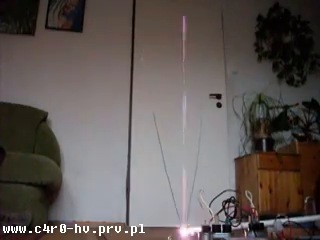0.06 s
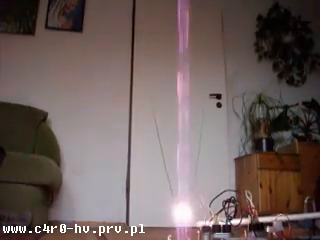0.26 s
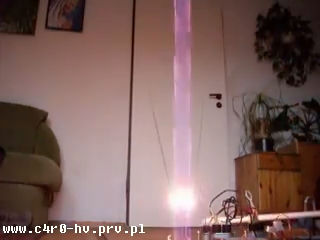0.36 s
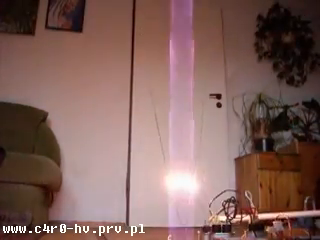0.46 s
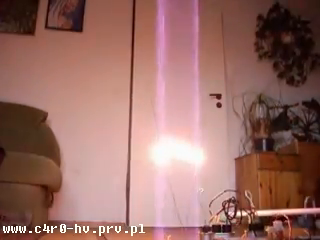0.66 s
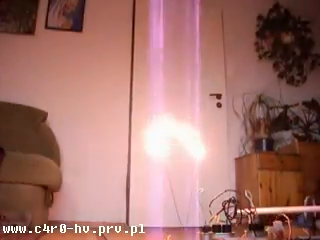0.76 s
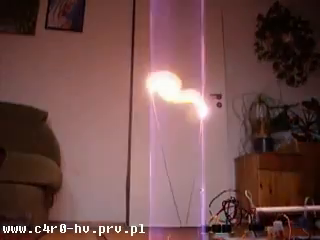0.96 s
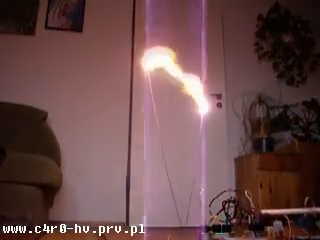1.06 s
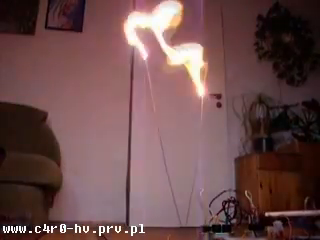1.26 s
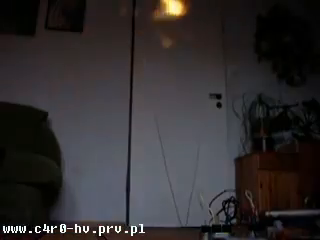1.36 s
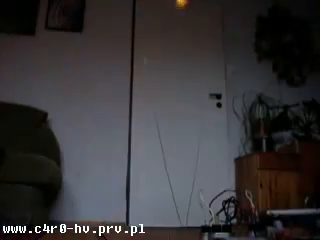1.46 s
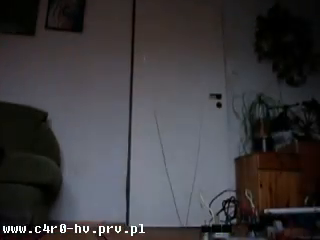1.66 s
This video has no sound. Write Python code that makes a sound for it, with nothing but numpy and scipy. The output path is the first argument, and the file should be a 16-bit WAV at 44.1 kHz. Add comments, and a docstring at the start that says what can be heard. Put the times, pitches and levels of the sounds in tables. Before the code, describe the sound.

In a small quiet room, a high-voltage arc snaps and sizzles to life, growing into a loud, raspy, crackling buzz. Its hum deepens as it stretches, until it suddenly breaks and only faint hiss remains.

```python
"""A mains arc strikes at the foot of two diverging wires, climbs, stretches and breaks, in a small room. It
relights on every half cycle, and the suddenly heated air gives a pressure pop and a bright crackle. The longer
the arc gets, the deeper it hums and the more its pops split and scatter. The room rings briefly after the
break. A steady hiss and a faint low flutter lie under the whole scene."""
import sys
import numpy as np
from scipy import signal
from scipy.fft import rfft, irfft
from scipy.io import wavfile

SR = 44100
rng = np.random.default_rng(int(sys.argv[2]) if len(sys.argv) > 2 else 0)


def generate_wav(signal):
    """Clip the signal to [-1, 1] and save it as 16-bit WAV at the path in sys.argv[1]."""
    frames = np.transpose(np.atleast_2d(signal))
    scaled = np.clip(frames, -1, 1) * 32767
    pcm = np.round(scaled).astype(np.int16)
    wavfile.write(sys.argv[1], SR, pcm)


N = 74970

RESTRIKE_HZ, FIRST_STRIKE_S = 99.78, .0502  # two strikes per mains cycle
BREAK_S, BREAK_FADE_S = 1.296, 0.004
TOP_HZ = 7150  # upper band edge

# Growth of the climbing arc: time_s, nominal_leg_lag_ms, pop_width_ms, pop_bass_db
ARC_GROWTH = [(.25, 0.06, 0.04, -34), (.36, 0.36, 0.14, -5), (.5, 0.24, 0.17, -3), (.65, 0.13, 0.12, 2.5),
              (.75, 0.84, 0.17, -1.5), (.81, 1.39, .12, 0.5), (1.08, 1.25, 0.19, -2.5),
              (1.17, 0.89, 0.17, 3.5), (1.29, 0.72, 0.35, 5)]
# Violent restrikes: time_s, relative_crack_db, brightness (0 to 1), extra_pop_db
VIOLENT_STRIKES = [(.07, -29, 0.46, -4.5), (.12, -24, 0.8, 1.5), (.15, -31.5, 1, 5), (.17, -39.5, .5, 8.5),
                   (.19, -15.5, 1, 4.5), (.23, -18, 1, 11), (.25, -26, .7, 8), (.27, -15.5, .9, 10.5),
                   (.29, -32, 0.7, 1.5), (.30, -18, 0.1, 10), (.33, -11.5, 0.5, 8), (.341, -26.5, 0.3, 3),
                   (.381, -29.5, 0.6, 2.5), (.441, -36.5, 0.5, 2), (.451, -31.5, 0.1, 4.5),
                   (.481, -17, 0.3, -30.5), (.521, -30, 0.2, 5), (.541, -24.5, 1, 3), (.622, -23, 0.4, 0.5),
                   (.672, -32, 0.3, 1), (.702, -30, 1, -1), (.823, -30, 0, 2), (.832, -38, 0, 7),
                   (.842, -23.5, 0, -21.5), (.892, -17.5, 0.83, 4), (.902, -27.5, 1, -2.5),
                   (.932, -25, 0.6, -9.5), (.982, -37, 0, -2), (1.012, -23, 0, -6.5), (1.072, -35, 0, 5),
                   (1.112, -32, 0.1, 0.5)]


def undb(db):
    """Decibels to amplitude ratio."""
    return 10 ** (np.asarray(db) / 20)


def curve(rows, t, column=1):
    """Linear interpolation of one column of a table over time."""
    rows = np.array(rows, float)
    return np.interp(t, rows[:, 0], rows[:, column])


def unit(x):
    """Normalisation to rms 1."""
    return x / np.sqrt(np.mean(x ** 2))


def colour(x, spectrum):
    """Zero-phase filtering that conserves the energy of a click or of white noise."""
    hz, db = np.array(spectrum, float).T
    f = np.fft.rfftfreq(2 * N, 1 / SR)
    gain = undb(np.interp(np.log(f + 1), np.log(hz), db)) / np.sqrt(1 + (f / TOP_HZ) ** 20)
    return irfft(rfft(x, 2 * N) * unit(gain))[:N]


def clicks(times, sizes):
    """Fractional delay: each impulse is shared between two neighbouring samples."""
    at = np.clip(times * SR, 0, N - 2)
    i = at.astype(int)
    return np.bincount(i, sizes * (1 - at + i), N) + np.bincount(i + 1, sizes * (at - i), N)


def nearest_strike(times):
    """Index of the periodic restrike nearest to each moment."""
    return np.maximum(np.round((times - FIRST_STRIKE_S) * RESTRIKE_HZ), 0).astype(int)


def burning(t):
    """Arc extinction: a gain of 1 that ramps to 0 at the break."""
    return np.clip((BREAK_S - t) / BREAK_FADE_S + 1, 0, 1)


def background(t):
    """Noise floor: steady hiss and a faint pulse train of soft thumps, heard as a low flutter."""
    # Spectrum of the hiss: frequency_hz, gain_db
    hiss_spectrum = [(20, 0.5), (70, -21.5), (130, 5), (320, -5), (600, -6), (1100, -15.5), (2500, -21.5),
                     (7000, -23)]
    flutter_hz, start_s, edge_s, decay_s = 30.1, .016, 0.0012, 0.0026
    from_thump_s = (((t - start_s) * flutter_hz + .5) % 1 - .5) / flutter_hz
    thumps = np.tanh(from_thump_s / edge_s) * np.exp(-np.abs(from_thump_s) / decay_s)
    return undb(-58.5) * unit(thumps) + undb(-60) * colour(rng.standard_normal(N), hiss_spectrum)


def room(x, tail_db):
    """Reverberation: early reflections, standing waves and a diffuse tail add to the direct sound."""
    # Reflections from nearby surfaces: delay_ms, gain
    reflections = [(1.8, 0.094), (4.1, 0.19), (6.9, 0.13), (14.2, 0.092)]
    # Spectrum of the diffuse tail: frequency_hz, gain_db
    tail_spectrum = [(80, -12.5), (400, -2), (800, 3.5), (1400, 2), (2500, 0.5), (7000, -18)]
    # Standing waves: frequency_hz, gain_at_resonance
    standing_waves = [(124, 1.5), (232, 2.3), (294, 2.4), (328, 2.2), (356, 1.9), (395, 2.16), (452, 0.4),
                      (474, 0.38), (499, 0.3), (552, 0.4), (590, 0.27), (647, 1.7), (683, 1.3), (752, 1.3),
                      (848, 1.2), (1098, 1.3)]
    tail_t60_s, tail_onset_s, mode_t60_s = 0.26, 0.0055, .42
    t = np.arange(N) / SR
    delay_ms, gain = np.array(reflections).T
    early = clicks(delay_ms / 1000, gain)
    fade = np.exp(-np.log(1000) * t / tail_t60_s) * (1 - np.exp(-(t / tail_onset_s) ** 2))
    tail = unit(colour(rng.standard_normal(N), tail_spectrum) * fade) * np.sqrt(2 * TOP_HZ / SR / N)
    damping = np.log(1000) / mode_t60_s
    modes = sum(g * np.cos(2 * np.pi * hz * t) for hz, g in standing_waves)
    modes *= np.exp(-damping * t) * 2 * damping / SR
    return x + signal.fftconvolve(x, early + modes + undb(tail_db) * tail)[:N]


def sizzle(t):
    """Amplitude-modulated noise: a fine hiss while the arc burns, strongest while it is short."""
    # Spectrum of the sizzle: frequency_hz, gain_db
    spectrum = [(100, -7.5), (400, 10.5), (800, 12), (1200, 3), (2500, -2), (5000, -1.5), (7000, -12.5)]
    # Envelope of the sizzle: time_s, level_db
    envelope = [(0, -58.5), (.045, -60), (.06, -54), (.16, -50), (.22, -42.5), (.33, -44), (.5, -48.5),
                (.75, -54), (1.29, -54.5)]
    return colour(rng.standard_normal(N), spectrum) * undb(curve(envelope, t)) * burning(t)


def hum(t):
    """Thermal expansion: the hot channel pulses with the current; the room holds the note at the break."""
    # Relative levels of the two harmonics: time_s, fundamental_db, octave_db
    envelopes = [(0.0, -64, -60.5), (0.16, -60.5, -51.5), (0.412, -42.5, -36.5), (0.458, -41.5, -37),
                 (0.626, -34.5, -28.5), (0.752, -31, -27.5), (0.876, -28, -31), (0.908, -32.5, -29),
                 (1.09, -30, -30), (1.25, -26, -42.5), (1.28, -35.5, -41)]
    lags_s, t60_s, waver_depth = (.0013, 0.00037), 0.39, 0.19
    release = np.exp(-np.log(1000) * np.maximum(t - BREAK_S + BREAK_FADE_S, 0) / t60_s)
    knots = np.arange(0, N / SR, 2 / RESTRIKE_HZ)
    tone = 0
    for harmonic, lag_s in enumerate(lags_s, 1):
        waver = 1 + waver_depth * np.interp(t, knots, rng.standard_normal(len(knots)))
        size = undb(curve(envelopes, t, column=harmonic)) * waver
        tone += size * np.cos(2 * np.pi * harmonic * RESTRIKE_HZ * (t - FIRST_STRIKE_S - lag_s))
    return np.sqrt(2) * undb(-2) * tone * release


def sparks(times, sizes, filaments=3):
    """Filamentary discharge: clusters of clicks, looser in a longer arc, with brief gritty tails."""
    decay_s, grit = .0007, .45
    t = np.arange(N) / SR
    spread_s = 1.9 * curve(ARC_GROWTH, times, column=2) / 1000
    offsets_s = rng.uniform(-0.77, 1, (len(times), filaments)).T * spread_s
    clusters = sum(clicks(times + offsets_s[k], (-1) ** k * sizes) for k in range(filaments))
    tail_envelope = signal.fftconvolve(clicks(times, sizes), np.exp(-t / decay_s))[:N]
    tails = grit * tail_envelope * rng.standard_normal(N)
    return (clusters / np.sqrt(filaments) + tails) / np.sqrt(1 + grit ** 2 * decay_s * SR / 2)


def crackle(times):
    """Dielectric breakdown: an uneven spark at each restrike, and violent cracks from dull to bright."""
    # Envelope of the small sparks: time_s, relative_level_db
    envelope = [(.05, -51.5), (.16, -58), (.25, -45), (.35, -32.5), (.5, -40.5), (.6, -38.5), (.72, -39),
                (.79, -40.5), (.87, -43.5), (.92, -38.5), (1.0, -47.5), (1.11, -42.5), (1.16, -70),
                (1.25, -47), (1.29, -70)]
    # Spectrum of small sparks and dull cracks: frequency_hz, gain_db
    dull_spectrum = [(300, -14.5), (900, 4.5), (1500, -6.5), (2000, 2.5), (2700, 2), (3400, -5),
                     (5000, -18), (7000, -32)]
    # Spectrum of bright cracks: frequency_hz, gain_db
    bright_spectrum = [(200, -30), (800, 6), (2600, -2.5), (4000, -3), (5200, -3.5), (7000, -20)]
    spark_trim_db, crack_trim_db, scatter_db, jitter_s = -0.5, 5.5, 2.5, 0.00035
    strength, lateness = rng.standard_normal((len(times), 2)).T
    spark_db = curve(envelope, times) + spark_trim_db + scatter_db * strength
    sizes = burning(times) * undb(spark_db) * np.sqrt(SR / RESTRIKE_HZ) / 2
    small = sparks(times + jitter_s * lateness, sizes)
    near_s, crack_db, brightness, _ = np.array(VIOLENT_STRIKES).T
    crack_times = times[nearest_strike(near_s)]
    cracks = sparks(crack_times, undb(crack_db + crack_trim_db))
    bright = cracks * np.interp(np.arange(N) / SR, crack_times, brightness)
    return colour(small + cracks - bright, dull_spectrum) + colour(bright, bright_spectrum)


def churn(pulses, decay_s=0.0021):
    """Turbulence: hot air leaves a decaying burst of noise after each pressure pulse."""
    envelope = signal.lfilter([1], [1, -np.exp(-1 / (decay_s * SR))], pulses)
    return envelope * rng.standard_normal(N) / np.sqrt(decay_s * SR / 2)


def pops(times):
    """Sudden heating: each leg of the arc sends a pressure pulse; their lag alternates with polarity."""
    # Envelope of the pops: time_s, relative_level_db
    envelope = [(.05, -60), (.13, -61.5), (.2, -44.5), (.28, -35), (.34, -26), (.42, -25), (.5, -26.5),
                (.57, -25), (.67, -26), (.76, -26.5), (.84, -27.5), (1.0, -23), (1.11, -26.5), (1.17, -34),
                (1.29, -35.5)]
    # Half cycles in which the arc relights softly: time_s, extra_pop_db
    soft_strikes = [(.261, -28), (.311, -8), (.321, -18), (.511, -23), (.872, -2.5)]
    # Spectrum of the pops: frequency_hz, gain_db
    spectrum = [(60, -21.5), (150, -11.5), (220, -5), (300, -0.5), (400, -1), (500, 3.5), (600, -2.5),
                (700, 2), (820, -2), (1000, -8.5), (1150, -10), (1500, -12), (2500, -17.5), (7000, -67.5)]
    trim_db, scatter_db, jitter_ms, bass_hz = -1.5, 1.2, .05, 450
    polarity_share, writhe_share, leg_imbalance = .25, .17, .25
    strength, early_writhe, late_writhe, lateness = rng.standard_normal((len(times), 4)).T
    extra_db = scatter_db * strength
    for strikes in (np.array(VIOLENT_STRIKES), np.array(soft_strikes)):
        extra_db[nearest_strike(strikes[:, 0])] = strikes[:, -1]
    pop_db = curve(envelope, times) + trim_db + extra_db
    sizes = burning(times) * undb(pop_db) * np.sqrt(SR / RESTRIKE_HZ) / 2
    polarity = (-1) ** np.arange(len(times))
    lag_ms, width_ms = curve(ARC_GROWTH, times), curve(ARC_GROWTH, times, column=2)
    sigmas = np.linspace(-3, 3, 121)[:, None]
    gaussian = np.exp(-sigmas ** 2 / 2)  # a wider pulse sounds duller
    gaussian /= gaussian.sum()
    pulses = 0
    for side, writhe in ((-0.98, early_writhe), (0.76, late_writhe)):
        lag_share = side * (1 + polarity_share * polarity) / 2 + writhe_share * writhe
        offset_ms = lag_ms * lag_share + jitter_ms * lateness
        arrival_s = times + (offset_ms + width_ms * sigmas) / 1000
        pressure = gaussian * sizes * (1 + leg_imbalance * side * polarity)
        pulses += clicks(arrival_s.ravel(), pressure.ravel())
    popping = colour(pulses + 0.4 * churn(pulses), spectrum)
    bass = signal.sosfiltfilt(signal.butter(2, bass_hz, fs=SR, output="sos"), popping)
    bass_gain = undb(curve(ARC_GROWTH, np.arange(N) / SR, column=3))
    return popping + (bass_gain - 1) * bass


def scene():
    """Superposition: the arc, relighting every half cycle until it breaks, over the noise floor."""
    t = np.arange(N) / SR
    strike_times = np.arange(FIRST_STRIKE_S, N / SR, 1 / RESTRIKE_HZ)
    arc = room(pops(strike_times), tail_db=-5)
    arc += room(crackle(strike_times) + sizzle(t), tail_db=-6.5)
    return (arc + hum(t) + background(t))[None]


def record(dry):
    """Band limiting: a small microphone acts as a steep low-pass filter."""
    return signal.sosfilt(signal.ellip(10, .2, 70, TOP_HZ, fs=SR, output="sos"), dry)


dry = scene()
out = record(dry)
generate_wav(out)
```